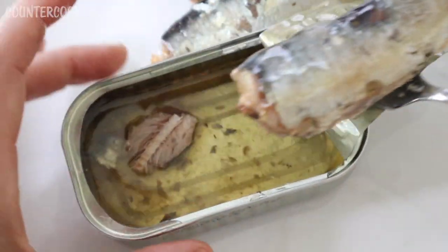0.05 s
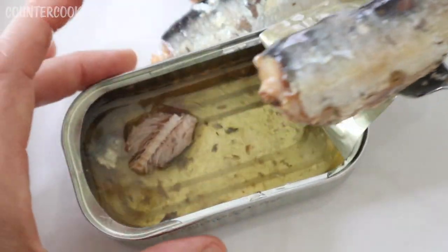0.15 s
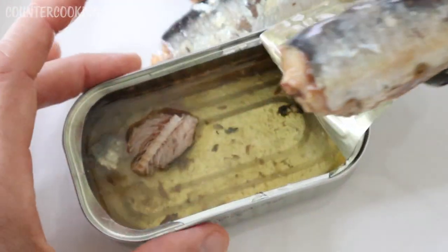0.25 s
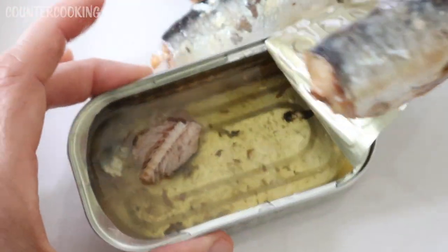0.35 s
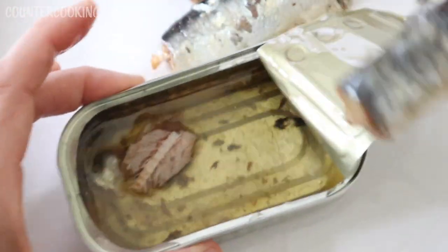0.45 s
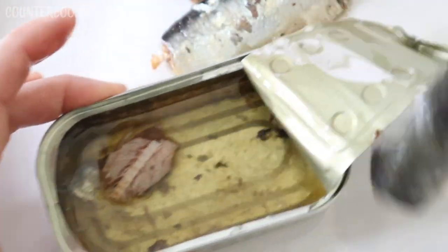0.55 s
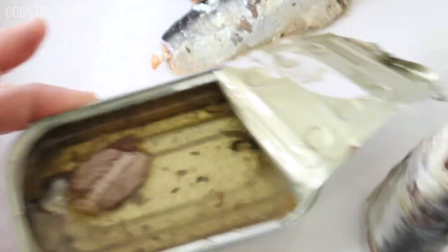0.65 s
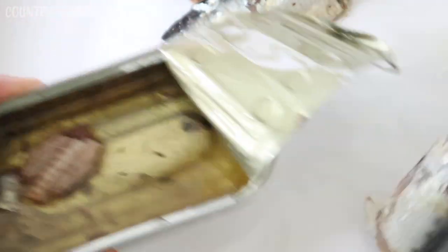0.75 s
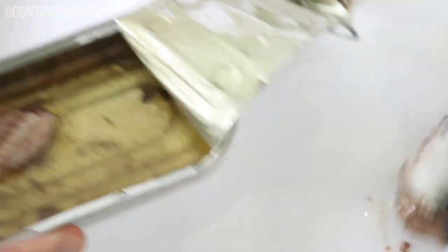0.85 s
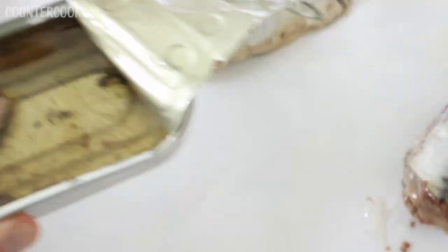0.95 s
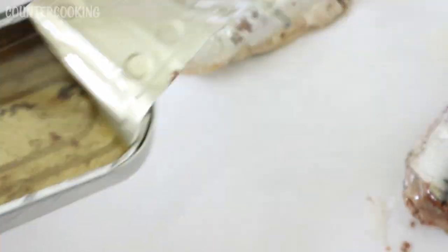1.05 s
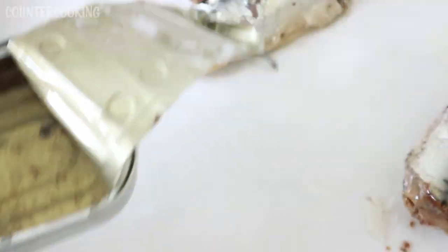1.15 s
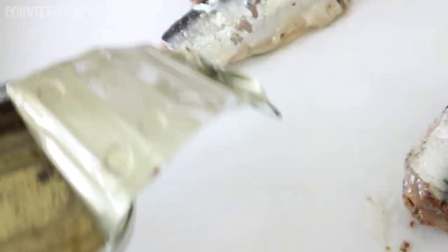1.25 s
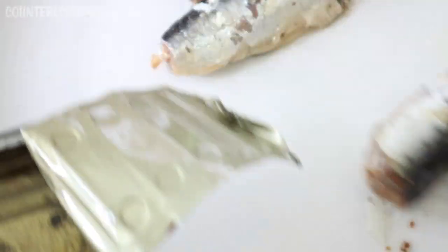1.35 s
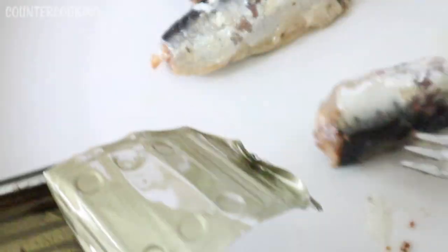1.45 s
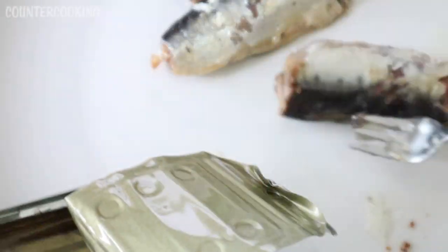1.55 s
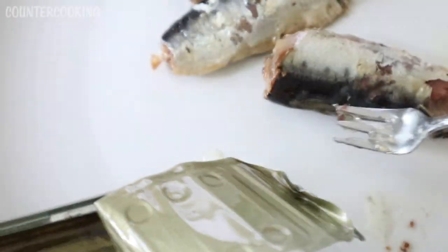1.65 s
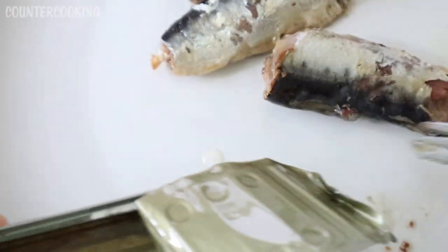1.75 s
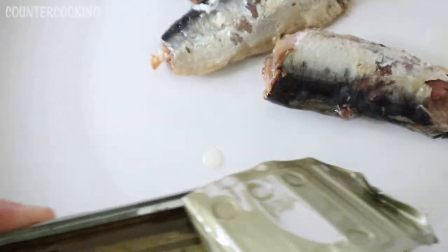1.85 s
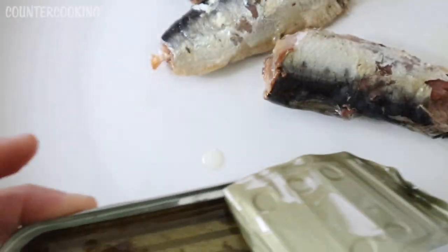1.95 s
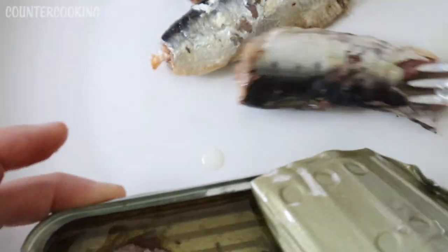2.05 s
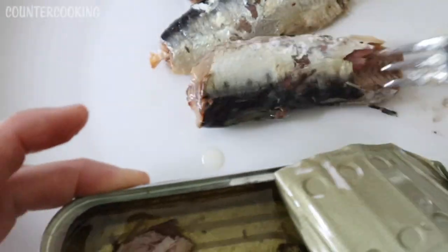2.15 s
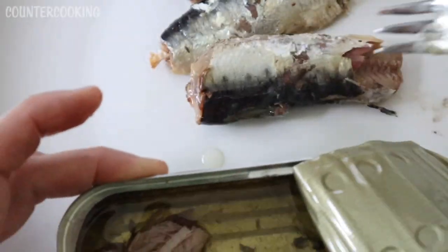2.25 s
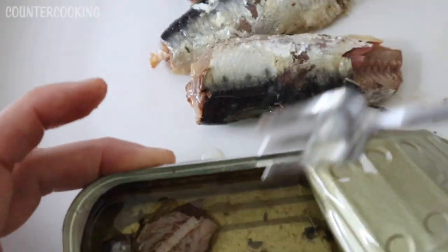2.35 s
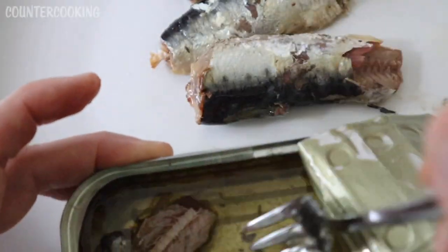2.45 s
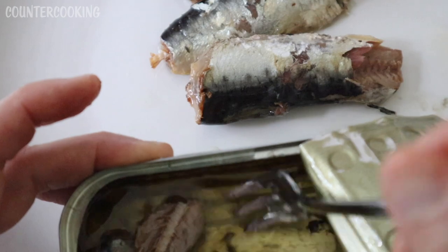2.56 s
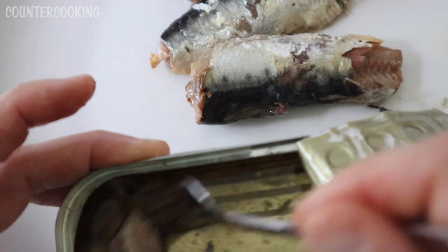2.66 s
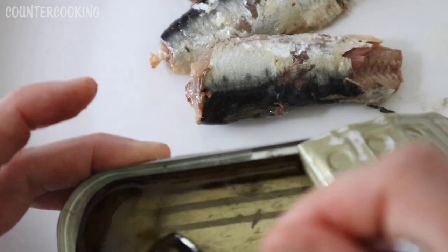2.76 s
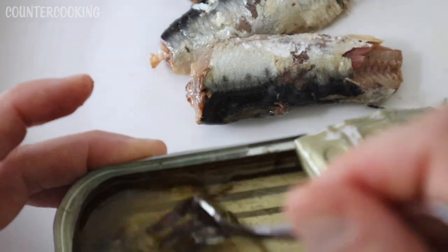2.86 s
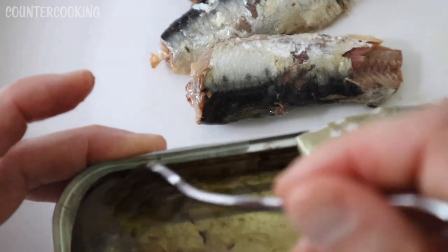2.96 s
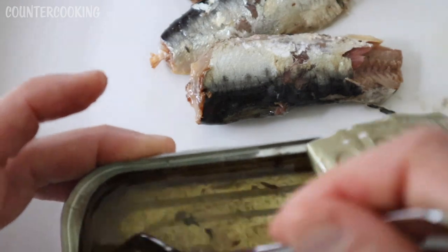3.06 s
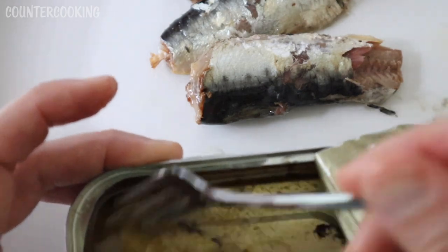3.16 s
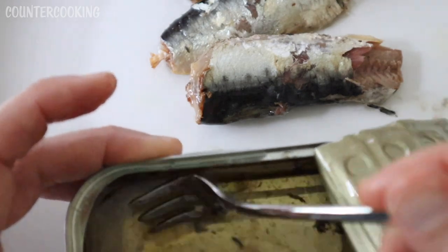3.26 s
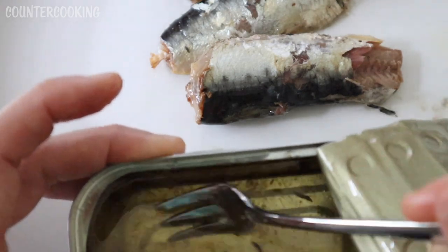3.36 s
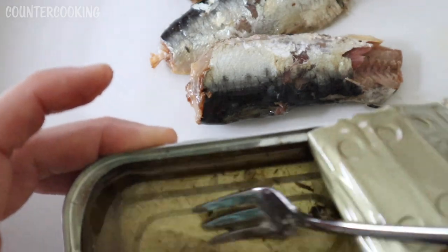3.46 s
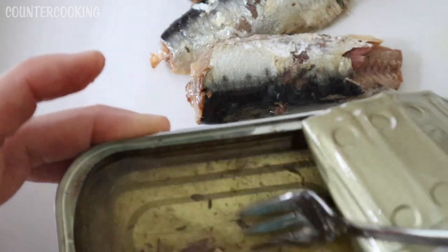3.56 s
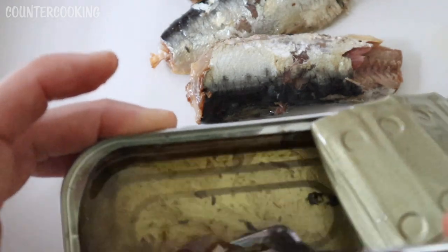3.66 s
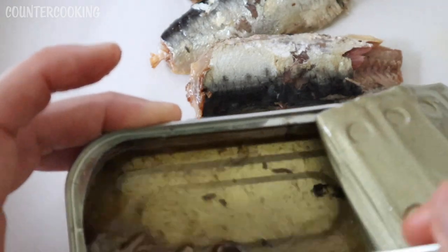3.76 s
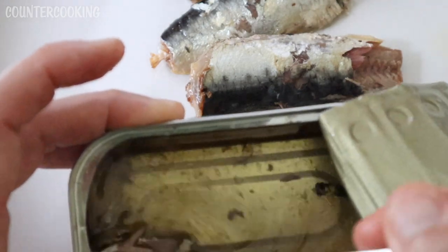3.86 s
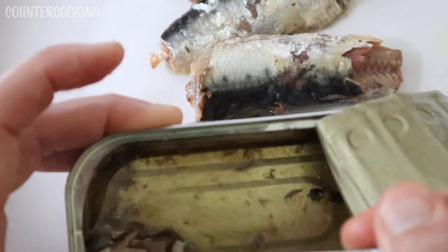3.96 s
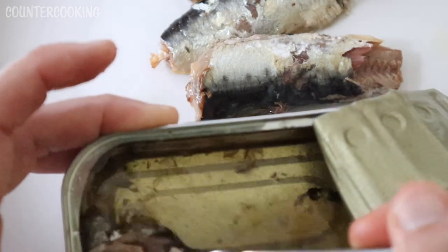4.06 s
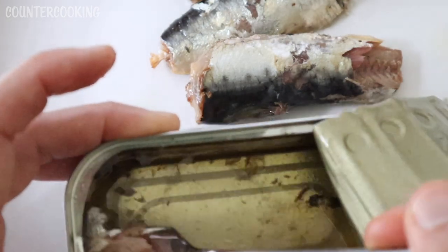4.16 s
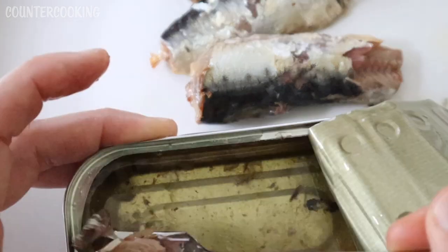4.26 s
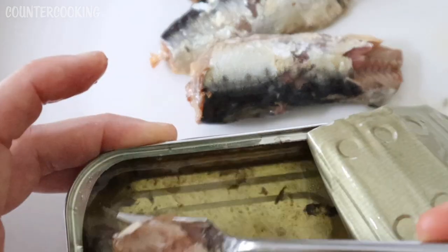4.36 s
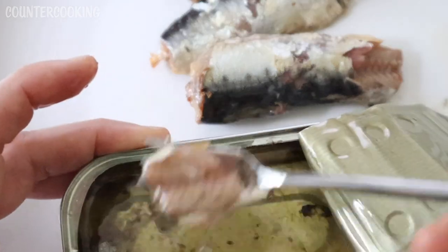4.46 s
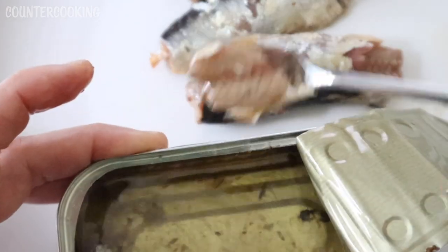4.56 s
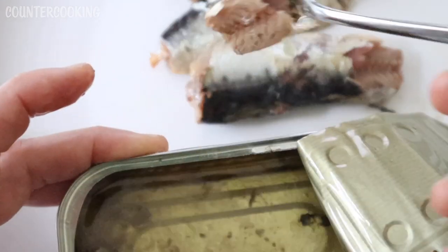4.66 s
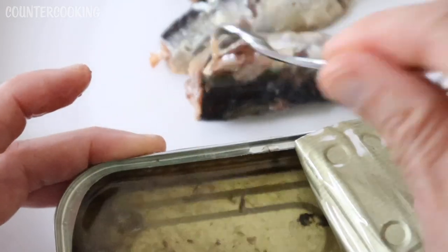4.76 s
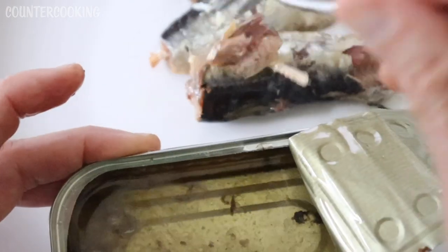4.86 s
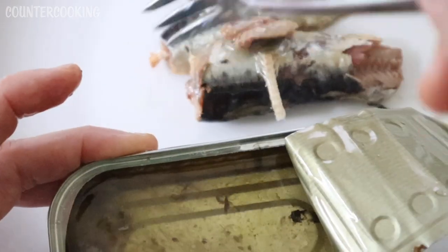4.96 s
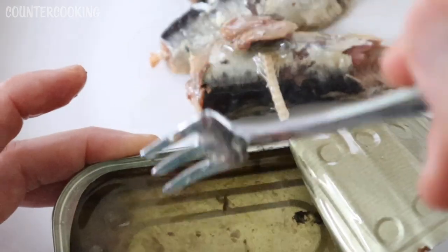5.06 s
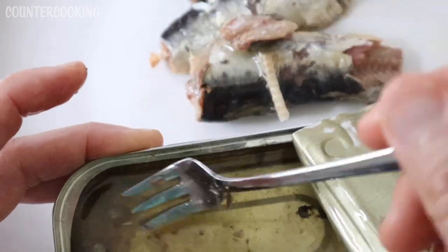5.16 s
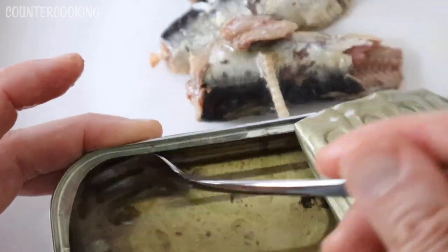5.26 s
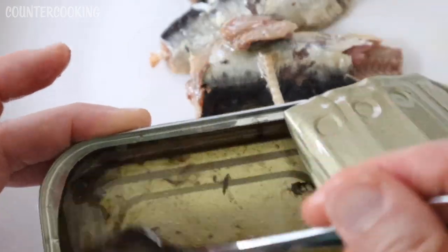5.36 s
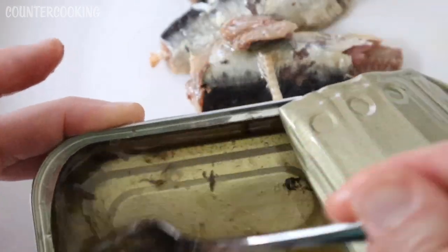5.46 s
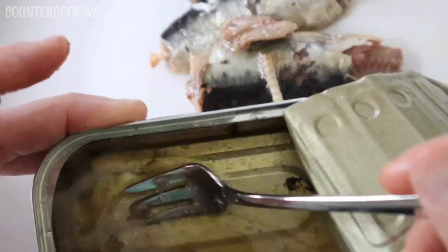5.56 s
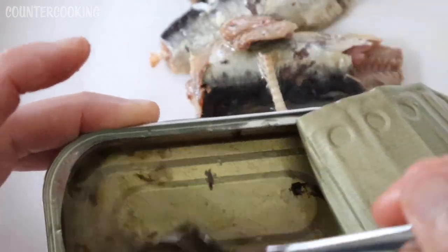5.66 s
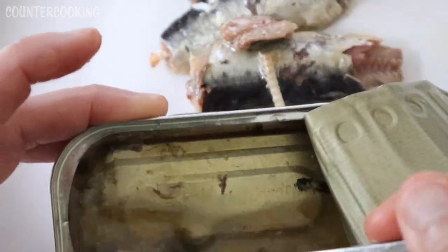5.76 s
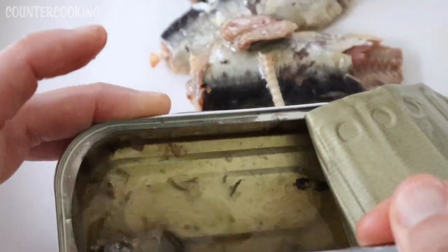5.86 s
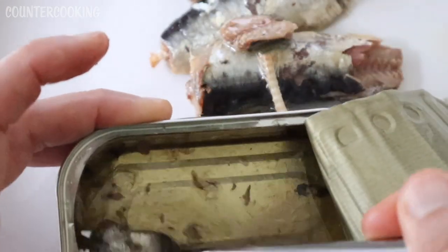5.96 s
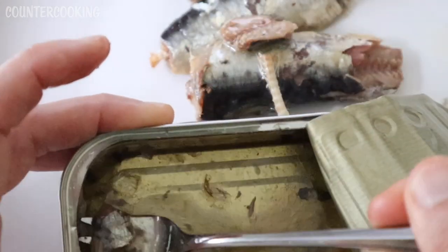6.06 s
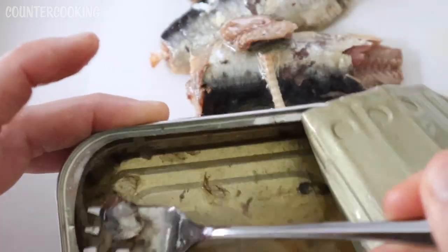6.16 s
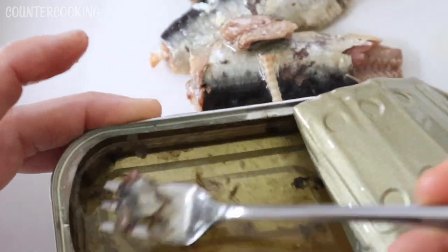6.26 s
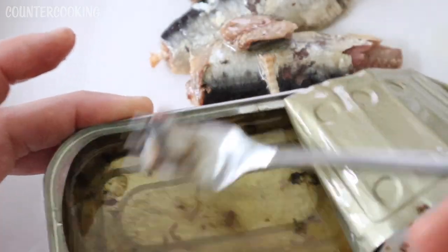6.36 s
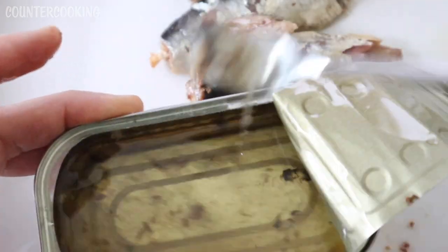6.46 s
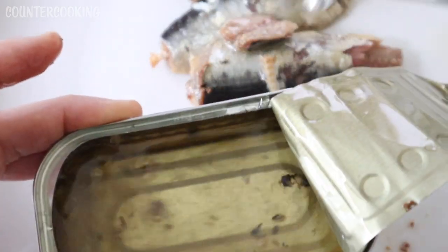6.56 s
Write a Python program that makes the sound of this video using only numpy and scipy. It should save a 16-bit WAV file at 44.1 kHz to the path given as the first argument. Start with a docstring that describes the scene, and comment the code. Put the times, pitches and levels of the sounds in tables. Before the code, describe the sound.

A quiet small kitchen, heard close, with low steady room noise throughout. From 0 to 0.8 s a thin tin drags over a plate, first barely audible, then grainier from 0.5 s with small crunches and tiny squeaks; deep bumps boom through the table at about 0.7 and 0.9 s. Quiet until 2.1 s, when a fork taps the plate in quick bounces, ringing briefly and brightly until 2.3 s. At 2.65 s tines knock and scrape in the tin with short squeaks. Single damped clinks come at 3.07, 3.25, 3.33 (strongest) and 3.6 s, with faint rubbing between and after, and a clink at 3.9 s. Light scraping and squeaking follows to 4.2 s; a soft bump at 4.8 s. From 5.25 to 5.77 s a busier cluster of clinks, squeaky scrapes and knocks, then faint rubbing near 5.9 to 6.0 s and barely audible touches at 6.2 s.

```python
"""A sardine tin slides over a plate, a grainy drag with small crunches, and bumps boom in the table.
A moment later a fork taps on the plate and rings freely.
Then its tines knock and scrape in the tin, with short squeaks and one more soft bump.
Oil and a steadying hand keep the thin metal short and dull: its tones are quickly dying sines and noise.
Throughout, close kitchen walls reflect these sounds and a low steady room noise lies beneath."""
import sys
import numpy as np
from scipy import signal
from scipy.fft import rfft, irfft
from scipy.io import wavfile

SR = 44100
rng = np.random.default_rng(int(sys.argv[2]) if len(sys.argv) > 2 else 0)


def wav_record(signal):
    """Record a signal, one row per channel, as 16-bit PCM in the file named by sys.argv[1]."""
    frames = np.transpose(np.atleast_2d(signal))
    bounded = np.clip(frames, -1, 1)
    # unit amplitude maps onto the largest positive 16-bit level
    quanta = np.round(bounded * 32767).astype(np.int16)
    wavfile.write(sys.argv[1], SR, quanta)


N = 291554  # length of the scene in samples

# colour of the room noise: pitch_hz, level_db (per Hz, relative)
ROOM_NOISE = [(12, -28), (20, -20.5), (43, 0.5), (92, -3.5), (240, -7), (310, -9.5), (433, -15.5),
              (830, -17.5), (7000, -36.5), (10500, -47.5), (13800, -64), (15000, -84.5)]
ROOM_NOISE_DB = -49
# side filter for the room noise: pitch_hz, gain_db
ROOM_NOISE_WIDTH = [(60, -19), (140, -9), (280, -1), (560, 4), (2000, 6.5), (10000, 7)]
# how long the kitchen's reflections last: pitch_hz, time_to_fall_60_db_s
KITCHEN_DECAY = [(150, 0.39), (700, 0.18), (2000, 0.29), (5000, 0.25), (12000, 0.23)]
# side filter for the reflections: pitch_hz, gain_db
REFLECTION_WIDTH = [(150, -44), (300, -18), (1100, -23), (2000, -11.5), (3600, -6), (7000, 3.5)]
# side filter for the direct sound: pitch_hz, gain_db
DIRECT_WIDTH = [(150, -46), (600, -39), (1100, -39.5), (1900, -31), (3600, -12), (6300, -8.5), (10000, -2)]
EDGE_HZ = 15900  # upper limit of the finished sound

# bumps on plate and table: start_s, thud_db, plate_ring_db, brightness_db_per_octave
BUMPS = [(0.684, -19.5, -58, -3), (.731, -29.5, -70, -1.5), (0.773, -33.5, -82, -4.5),
         (.925, -17.5, -43, 0.5), (2.104, -35.5, -45.5, 7.5), (2.129, -37.5, -58, 7),
         (2.237, -46, -43.5, 6), (4.809, -38.5, -93, -6.5)]
# tones of the table: pitch_hz, level_db, time_to_fall_60_db_s
TABLE_TONES = [(101, -5, 0.11), (129.4, 3.5, 0.23), (176.4, 3, 0.27), (239.6, 0, 0.17), (292.5, -5, 0.15),
               (340.6, -8.5, 0.17), (434, -7, 0.21), (482, -5, 0.096), (686, -9.5, 0.12), (827, -11, 0.12),
               (887, -2.5, 0.073), (1369, -8, 0.064)]
# tones of the plate: pitch_hz, level_db, time_to_fall_60_db_s
PLATE_TONES = [(1510, -1, 0.43), (2345, -8, 0.44), (3200, -7, 0.087), (4330, -6.5, 0.22), (6650, -3.5, 0.1),
               (9400, -5, 0.095), (11300, -6, 0.12)]

# loudness of the tin dragging over the plate: time_s, level_db
DRAG = [(0.03, -56.5), (0.12, -70), (0.36, -66), (0.43, -58.5), (0.5, -58), (0.56, -46), (0.6, -44.5),
        (0.65, -42), (0.67, -54), (0.72, -51), (0.75, -48), (0.78, -77)]
# moments when the sliding tin catches on the plate: start_s, level_db
CATCHES = [(.198, -47.5), (0.539, -41), (0.565, -38.5), (.572, -37.5), (0.592, -40), (0.602, -42),
           (0.629, -27), (.643, -45), (.656, -46), (0.672, -41), (0.689, -39), (0.713, -35), (0.733, -32.5),
           (0.741, -38)]
# colour of the ringing tin base: pitch_hz, level_db (per Hz, relative)
BASE_COLOUR = [(300, -29), (1100, -18), (1360, 8), (1620, -14), (1900, 8), (2080, 0.5), (2280, -1),
               (2620, -13), (2950, 1), (3280, -1), (3600, -6.5), (4350, -9.5), (4800, -21), (6700, -24),
               (8000, -27), (11000, -29), (15000, -46)]

# the fork bouncing on the plate: start_s, level_db
FORK_TAPS = [(2.108, -38), (2.128, -32.5), (2.236, -26), (2.2442, -30)]
# tones of the free fork: pitch_hz, level_db, time_to_fall_60_db_s
FORK_TONES = [(248.3, -9, 0.3), (750, -7, 0.15), (1646, 1, 0.14), (1786, 6.5, 0.14), (2005, 0, 0.17),
              (2730, -7, 0.21), (2780, -12, .1), (2925, 5, .12), (3200, -5, 0.12), (3420, -10, 0.18),
              (3673, -1, 0.16), (3925, -11, 0.08), (3960, -8, 0.13), (4204, -6.5, 0.084), (4720, -9, .19),
              (4940, -9, .17), (5356, -14, 0.16), (6320, -12, 0.14), (7402, -20, 0.19), (9405, -24, 0.14)]
# colour of the crack of steel on the plate: pitch_hz, level_db (per Hz, relative)
FORK_CRACK = [(150, -17), (800, -10.5), (1150, -13.5), (1800, 8.5), (2300, -2), (4100, 4.5), (4450, -17),
              (5200, -5), (5900, -17), (10500, -25), (13000, -48), (16000, -50)]

# squeaks of metal sticking as it slides: start_s, end_s, first_pitch_hz, last_pitch_hz, level_db
SQUEAKS = [(0.672, 0.701, 3380, 3110, -47), (0.707, 0.735, 3420, 3030, -49.5),
           (2.686, 2.707, 2740, 2740, -47), (2.698, 2.739, 4030, 4000, -42),
           (2.718, 2.736, 1520, 1410, -37), (2.736, 2.788, 2640, 2720, -43.5),
           (2.764, 2.788, 4110, 4050, -44.5), (2.774, 2.803, 1430, 1420, -42.5),
           (4.145, 4.182, 2960, 3200, -42), (4.156, 4.19, 1724, 1797, -37.5),
           (5.351, 5.404, 1880, 1877, -31), (5.357, 5.385, 2930, 3090, -36.5),
           (5.384, 5.411, 3250, 3600, -38), (5.447, 5.476, 2034, 2136, -29)]

# fixed tones of the tin: pitch_hz, level_db, time_to_fall_60_db_s (before the tines damp them)
TIN_TONES = [(247.6, -13, 0.026), (439, -13, 0.049), (1006, -6, 0.045), (1295, -6, 0.11),
             (1457, -2.5, 0.052), (1660, -8.5, 0.093), (1817, -7.5, 0.036), (1981, -7, 0.069),
             (2021, 1, 0.06), (2290, -8.5, 0.037), (2503, -19, 0.23), (2687, -11.5, 0.089),
             (2937, -13.5, 0.11), (3060, -10, 0.041), (3606, -21.5, 0.096), (3900, -16.5, 0.046),
             (4034, -16, 0.049), (4330, -27, 0.13), (5590, -28, 0.039), (7440, -31, 0.14),
             (9340, -23, 0.063), (10030, -18, 0.078)]
# colour of the tin's crowd of weak tones: pitch_hz, level_db (per Hz, relative)
TIN_CROWD = [(100, -18.5), (550, -26), (800, -1.5), (1150, -3), (1800, 11), (2700, -8.5), (3400, -9),
             (4300, -12), (4800, -13), (7600, -18.5), (10000, -16), (11400, -19.5), (13000, -38),
             (16000, -56)]
# note of the tin's floor, which shifts as hand and fork press on it: time_s, pitch_hz
FLOOR_NOTE = [(.6, 825), (2.15, 750), (2.7, 827), (3.3, 799.6), (3.6, 833), (4.2, 855), (5.26, 777),
              (5.42, 856), (5.65, 832), (5.73, 925.7), (6, 817)]
# borders of the bands thud, body, floor, wall, rim, edge and tick: pitch_hz
BANDS = [150, 340, 600, 1200, 2200, 3200, 7000, 16000]
# usual colour of a knock, one value for each band: level_db
KNOCK_DB = [-41, -29.5, -12, -7, -7.5, -14, -26.5]
# usual colour of a stroke, one value for each band: level_db
STROKE_DB = [-26.5, -20, -4, -7.5, -7.5, -17, -24]
# how much of a contact's weight goes into each band, mostly low ones: share (no unit)
WEIGHT_SHARE = [1, 0.066, 0.97, 0, 0, 0.22, 0.031]
# how much of a contact's hardness goes into each band, mostly high ones: share (no unit)
HARDNESS_SHARE = [0.067, 0.21, 0.022, 0.13, 0.6, 1.62, 1.24]
WALL_NOTE_DB = 7  # lift of the band that holds the wall's note
# strokes of the fork: start_s, end_s, level_db, swell_db, wall_pitch_hz, weight_db, hardness_db
SCRAPES = [(2.664, 2.733, -32, -1, 1796, -4, 5), (2.733, 2.822, -38, -13, 1950, 1, 5.5),
           (3.396, 3.549, -45.5, 13, 1696, -3.5, -0.5), (3.595, 3.7, -35.5, 6, 2370, -5.5, -24),
           (3.717, 3.837, -45, -1.5, 1960, 5, 2.5), (3.913, 4.035, -40, 0.5, 2014, -2.5, 0.5),
           (4.067, 4.149, -40, 1, 2198, 6.5, -3), (4.144, 4.177, -41.5, -7, 1669, -2, 4.5),
           (5.297, 5.348, -42, 15, 1874, 2.5, -2.5), (5.354, 5.414, -29, -8, 1819, -4, 5.5),
           (5.426, 5.469, -31.5, 5, 2000, -2.5, 4.5), (5.682, 5.726, -39, -8, 1951, 8.5, 0),
           (5.737, 5.768, -34, -16, 1943, 4, 3), (5.863, 5.931, -45.5, -4, 2170, -1.5, -2),
           (5.96, 6.019, -39.5, 10, 2100, -3.5, 5)]
# knocks of the fork: start_s, level_db, wall_pitch_hz, weight_db, hardness_db, sharp_tick_db
CLINKS = [(2.106, -32.5, 1736, 19.5, 2, 0), (2.181, -34, 1676, 8, -2.5, 2), (2.642, -23, 1620, 4.5, -3, 11),
          (2.65, -29, 2080, -10, -6.5, -1), (2.668, -29.5, 2110, 2, -3, -10),
          (3.064, -25, 1893, 2, -2.5, 11), (3.07, -27, 1580, 5, 1.5, -17),
          (3.2436, -20, 1860, 1, -3.5, -0.5), (3.311, -45, 1920, 12, 0.5, 17),
          (3.3257, -15.5, 2058, 6, 1.5, 0), (3.33, -24, 1760, 11, -9.5, 27.5),
          (3.5877, -16.5, 2308, -2.5, -2, 5.5), (3.64, -25.5, 2189, 3.5, -1.5, 9.5),
          (3.769, -38, 1960, 5, 2, 3.5), (3.899, -20.5, 2043, 1.5, -8, 9.5),
          (4.283, -44, 1830, 15.5, 3.5, 8), (5.2646, -22.5, 1810, 2, -1, 4.5),
          (5.333, -44, 1902, 4, -4, 12), (5.419, -22.5, 1820, -9, 3.5, -3),
          (5.4245, -28.5, 2050, 4.5, -5, 4), (5.449, -42, 2070, 10, -2, -10),
          (5.462, -32, 2045, 0, -0.5, -4), (5.6129, -23.5, 2137, 4, -5, 0.5),
          (5.618, -30.5, 2087, -6, -5.5, -27), (5.695, -27.5, 3010, -12, -10, -15),
          (5.722, -34, 2079, 12, -8, 1), (5.748, -32, 1970, 9, -1, -6), (5.756, -32.5, 1790, -6, -4, -8),
          (6.176, -52.5, 1920, 23, 1.5, 10.5), (6.198, -47.5, 1940, -15.5, -8, 3)]


def amp(db):
    """Turn decibels into a plain multiplier."""
    return 10 ** (np.asarray(db) / 20)


def evened(x):
    """Bring each channel to an average (RMS) strength of one."""
    return x / np.sqrt(np.mean(x ** 2, axis=-1, keepdims=True) + 1e-20)


def read(points, hz):
    """Read a curve at any pitch, with pitch on a log scale."""
    f, value = np.transpose(points)
    return np.interp(np.log(hz + 1), np.log(f + 1), value)


def add(mix, s, sound):
    """Lay a sound into the mix at s seconds, cut off at the end of the mix."""
    part = mix[:, round(s * SR):][:, :sound.shape[1]]
    part += sound[:, :part.shape[1]]


def convolve(a, b):
    """Let every sample of one sound set off a copy of the other."""
    return signal.fftconvolve(np.atleast_2d(a), np.atleast_2d(b), axes=1)


def colour(x, points, size=4096):
    """Filter a sound to a given dB curve, without any sound ahead of its cause."""
    cepstrum = irfft(np.log(amp(read(points, np.fft.rfftfreq(size, 1 / SR)))))
    # folding the cepstrum forward makes the filter respond as early as it can
    cepstrum[1:size // 2] *= 2
    cepstrum[size // 2 + 1:] = 0
    response = irfft(np.exp(rfft(cepstrum)))
    return convolve(x, response)[:, :x.shape[1]]


def wander(n, per_s):
    """A random curve: straight lines between per_s random points a second."""
    knots = rng.standard_normal(200)
    return np.interp(np.arange(n) * per_s / SR, np.arange(len(knots)), knots)


def ring(modes, t, spread_db, detune=0):
    """Dying sines as mid and side; each blow shares its energy, and may bend the tones, differently."""
    hz, db, t60 = np.transpose(modes)
    hz = hz * (1 + detune * rng.standard_normal(len(hz)))
    gains = amp(db + spread_db * rng.standard_normal((2, len(hz))))
    gains = gains * rng.choice([-1, 1], (2, len(hz)))
    sines = np.sin(2 * np.pi * hz[:, None] * t)
    return gains @ (sines * amp(-60 * t / t60[:, None]))


def spread(x, width):
    """Mid and side become left and right."""
    mid, side = x[0], colour(x[1:], width)[0]
    return np.array([mid + side, mid - side])


def hush():
    """The low steady noise of the room: random noise shaped by a fixed curve."""
    gain = amp(read(ROOM_NOISE, np.fft.rfftfreq(N, 1 / SR)))
    noise = irfft(rfft(rng.standard_normal((2, N))) * gain, N)
    return amp(ROOM_NOISE_DB) * evened(noise)


def kitchen(x, wet_db=-9, size=20000):
    """Sparse reflections from close walls, each band dying at its own speed."""
    echoes_per_s, build_up_s = 3000, 0.0096
    taps = rng.standard_normal((2, size)) * (rng.random((2, size)) < echoes_per_s / SR)
    hz, t, z = signal.stft(taps, SR, nperseg=256)
    fading = z * amp(-60 * t / read(KITCHEN_DECAY, hz)[:, None])
    tail = signal.istft(fading, SR, nperseg=256)[1][:, :size]
    build_up = np.clip(np.arange(size) / SR / build_up_s, 0, 1) ** 2
    tail = evened(tail * build_up) / np.sqrt(size)
    # pitch_hz, gain_db
    tail = colour(tail, [(150, -3.5), (400, 5.0), (900, -3), (2000, -5), (4000, 0.5), (11000, 0.0)])
    return amp(wet_db) * convolve(x, tail)[:, :N]


def bumps(knock_db=-9, knock_t60=0.27, tick_db=9, tick_t60=0.053, size=26000):
    """A bump booms in the table and leaves a tick and a faint ring in the plate."""
    # pitch_hz, level_db per Hz
    knock_colour = [(50, -18), (250, 9.5), (900, 3.5), (2000, -10.5), (6000, -32.0), (15000, -48)]
    tick_colour = [(2000, 4), (6500, -13), (11500, -5.5), (15000, -35)]
    out, t = np.zeros((2, N)), np.arange(size) / SR
    for s, thud_db, plate_db, tilt_db in BUMPS:
        # brightness tilts the table's tones around 170 Hz
        tilted = [(hz, db + tilt_db * np.log2(hz / 170), t60) for hz, db, t60 in TABLE_TONES]
        table = ring(tilted, t, spread_db=3.5)
        knock = evened(colour(rng.standard_normal((2, size)), knock_colour))
        knock *= amp(knock_db + tilt_db - 60 * t / knock_t60)
        thud = (table + knock) * (1 - np.exp(-t / 0.0013))  # soft onset
        tick = evened(colour(rng.standard_normal((2, size)), tick_colour))
        tick *= amp(tick_db - 60 * t / tick_t60)
        plate = tick + ring(PLATE_TONES, t, spread_db=0.5)
        add(out, s, amp(thud_db - 3.5) * thud + amp(plate_db) * plate)
    return out


def base(ring_db=-3, ring_t60=0.063, tick_db=2, tick_t60=0.0091, rise_s=0.00071, size=3000):
    """A tick and the brief ring of the tin's base, a little different each time it is made."""
    t = np.arange(size) / SR
    fall = amp(ring_db - 60 * t / ring_t60) + amp(tick_db - 60 * t / tick_t60)
    noise = evened(colour(rng.standard_normal((2, size)), BASE_COLOUR))
    return noise * fall * (1 - np.exp(-t / rise_s))


def slide(grains_per_s=190, grain_spread_db=5, gain_db=-2, count=6):
    """Grit between tin and plate rings the tin's base; now and then its rim catches with a small crunch."""
    times, db = np.transpose(DRAG)
    t, out = np.arange(0, times[-1], 1 / SR), np.zeros((2, N))
    hits = rng.random(len(t)) < grains_per_s / SR
    force = hits * amp(grain_spread_db * rng.standard_normal(len(t)))
    # each grain sets off one of a few versions of the ring
    spot = rng.integers(0, count, len(t))
    grit = evened(sum(convolve(force * (spot == k), base())[:, :len(t)] for k in range(count)))
    add(out, 0, grit * amp(gain_db + np.interp(t, times, db, left=-np.inf)))
    for s, catch_db in CATCHES:
        add(out, s, amp(catch_db) * base())
    return out


def fork_taps(crack_db=12.0, crack_t60=0.052, ring_db=-3, size=14000):
    """Outside the tin the tines bounce on the hard plate: a crack, then the fork rings freely."""
    out, t = np.zeros((2, N)), np.arange(size) / SR
    for s, db in FORK_TAPS:
        crack = evened(colour(rng.standard_normal((2, size)), FORK_CRACK))
        crack *= amp(crack_db - 60 * t / crack_t60)
        ringing = amp(ring_db) * ring(FORK_TONES, t, spread_db=2.5, detune=0.0029)
        add(out, s, amp(db) * (crack + ringing))
    return out


def squeaks(waver_hz=80, flutter_db=5, overtone_db=-16):
    """Metal sticks as it slides: a rough, gliding note with weak overtones."""
    out = np.zeros((2, N))
    for start, end, first_hz, last_hz, db in SQUEAKS:
        n = max(round((end - start) * SR), 400)
        hz = np.linspace(first_hz, last_hz, n) + waver_hz * wander(n, per_s=725)
        phase = 2 * np.pi * np.cumsum(hz) / SR
        note = np.zeros((2, n))
        for k in range(3):
            overtone = np.array([np.sin((k + 1) * phase), np.cos((k + 1) * phase)])
            note += amp(overtone_db * k) * overtone
        flutter = amp(flutter_db * wander(n, per_s=390))
        add(out, start, amp(db) * evened(note * flutter * signal.windows.tukey(n, .3)))
    return out


def floor_note(s):
    """The pitch of the tin's floor at this moment, set by the pressure of hand and fork."""
    return np.interp(s, *np.transpose(FLOOR_NOTE))


def tin(floor_hz, wall_hz, hold, bend=1, spread_db=4.5, note_db=3, floor_t60=0.079, wall_t60=0.1,
        sheet_db=3, sheet_t60=0.08, crack_db=10, crack_t60=0.012, size=7000):
    """The tin's answer to one tap: two movable notes, nearly fixed tones, and a crowd of brief ones."""
    t = np.arange(size) / SR
    notes = [(floor_hz * bend, note_db, floor_t60), (wall_hz * bend, note_db, wall_t60)]
    tones = ring(TIN_TONES + notes, t, spread_db, detune=0.01)
    # bend moves the two notes and the crowd up or down in pitch
    crowd = evened(colour(rng.standard_normal((2, size)), np.multiply(TIN_CROWD, [bend, 1])))
    crowd *= amp(sheet_db - 60 * t / sheet_t60) + amp(crack_db - 60 * t / crack_t60)
    # tines that stay pressed on the metal choke it
    damping = np.interp(t, [0, .012], [1, hold ** 2])
    return (tones + crowd) * damping * (1 - np.exp(-t / 0.00058))


def contact(usual_db, level_db, wall_hz, weight_db, hardness_db, tick_db=0):
    """Band levels of a contact: weight drives low bands, hardness high ones, a sharp tip the top one."""
    holds_note = np.diff(np.greater(BANDS, wall_hz).astype(int))
    band_db = level_db + np.add(usual_db, WALL_NOTE_DB * holds_note)
    band_db = band_db + np.multiply(weight_db, WEIGHT_SHARE) + np.multiply(hardness_db, HARDNESS_SHARE)
    band_db[-1] += tick_db
    return band_db


def voiced(x, band_db, span):
    """The point of contact sets how strongly each band sounds over the first span seconds."""
    n = round(span * SR)
    hz = np.fft.rfftfreq(2 * n, 1 / SR)
    centres = np.sqrt(np.multiply(BANDS[:-1], BANDS[1:]))
    fade = signal.windows.tukey(2 * n, .2)[n:]
    for _ in range(2):  # the second pass comes closer to the wanted levels
        power = abs(rfft(x[0, :n] * fade, 2 * n)) ** 2 / n ** 2
        band_power = [power[(hz >= lo) & (hz < hi)].sum() for lo, hi in zip(BANDS, BANDS[1:])]
        now_db = 10 * np.log10(np.array(band_power) + 1e-20)
        x = colour(x, np.c_[centres, np.subtract(band_db, now_db)])
    return x


def scrapes(typical_slips_per_s=260, firm_db=-32, halving_db=6, jitter=.65, slip_spread_db=8,
            grit_db=-27, pressure_db=2, spot_s=.02, spot_bend=.06, gain_db=-6.0):
    """Tines stick and slip under uneven pressure, with fine grit; each new spot rings differently."""
    out = np.zeros((2, N))
    for start, end, db, swell_db, wall_hz, *touch_db in SCRAPES:
        n = max(round((end - start) * SR), 400)
        gaps, sizes = rng.standard_normal(400), rng.uniform(-1, 1, 400)
        # a light touch rubs finely, a firm one sticks longer
        rate = typical_slips_per_s * 2 ** ((firm_db - db) / halving_db)
        at = (np.cumsum(np.exp(jitter * gaps)) * SR / rate).astype(int)
        inside = at < n
        force = amp(grit_db) * rng.standard_normal(n)
        force[at[inside]] += amp(slip_spread_db * sizes[inside])
        pressure = np.linspace(0, swell_db, n) + pressure_db * wander(n, per_s=98.0)
        force *= amp(pressure) * signal.windows.tukey(n, .08)
        # the tines reach a new spot every spot_s seconds
        place, rubbed = (np.arange(n) / SR / spot_s).astype(int), 0
        for k in np.unique(place):
            bend = np.exp(spot_bend * rng.standard_normal())
            spot = tin(floor_note(start), wall_hz, hold=0.98, bend=bend,
                       spread_db=6.5, sheet_db=5.5, crack_db=10, size=4500)
            rubbed = rubbed + convolve(force * (place == k), evened(spot))
        band_db = contact(STROKE_DB, db, wall_hz, *touch_db)
        add(out, start, voiced(rubbed, band_db, span=n / SR))
    return amp(gain_db) * out


def clinks(hold=0.8):
    """Single blows of the tines set the tin ringing, and the resting tines soon damp it."""
    out = np.zeros((2, N))
    for s, db, wall_hz, *touch_db in CLINKS:
        band_db = contact(KNOCK_DB, db, wall_hz, *touch_db)
        add(out, s, voiced(tin(floor_note(s), wall_hz, hold), band_db, span=1 / 50))
    return out


def scene():
    """The tin sits straight ahead; reflections and room noise come from all around."""
    near = bumps() + slide() + fork_taps() + squeaks() + scrapes() + clinks()
    room_noise = spread(hush(), ROOM_NOISE_WIDTH)
    reflections = spread(kitchen(near), REFLECTION_WIDTH)
    return room_noise + reflections + spread(near, DIRECT_WIDTH)


def record(dry):
    """Full-scale clipping, then a low-pass filter that removes the highest treble."""
    low_pass = signal.firwin(511, EDGE_HZ, window=("kaiser", 9), fs=SR)
    return signal.oaconvolve(np.clip(dry, -1, 1), low_pass[None], "same", axes=1)


dry = scene()
out = record(dry)
wav_record(out)
```